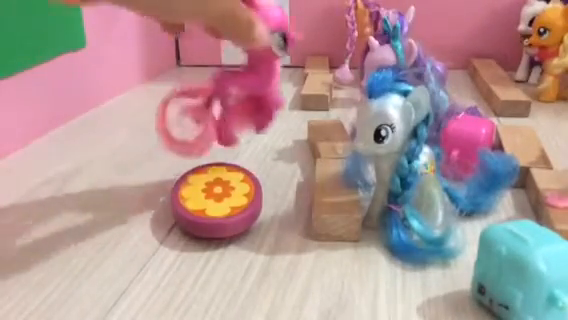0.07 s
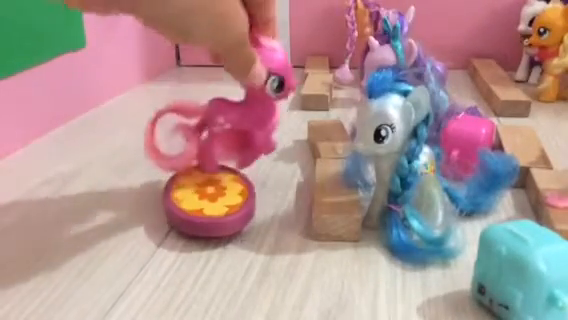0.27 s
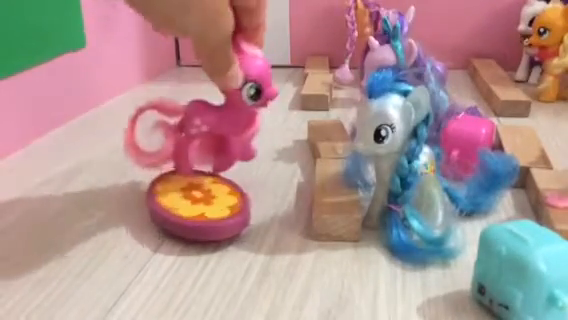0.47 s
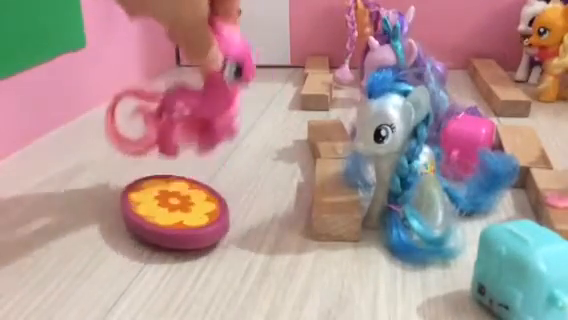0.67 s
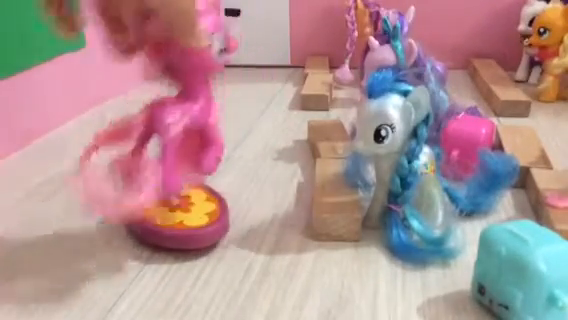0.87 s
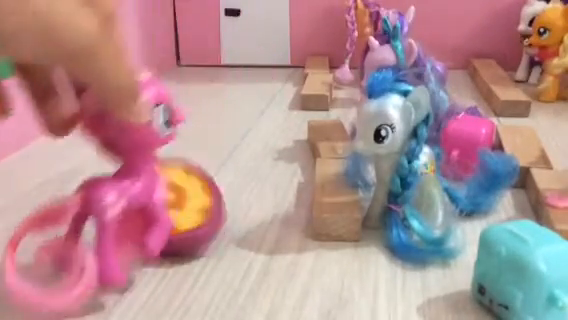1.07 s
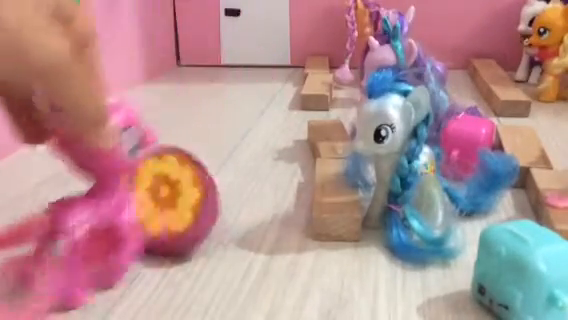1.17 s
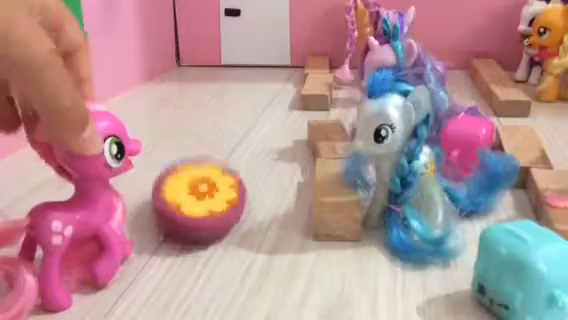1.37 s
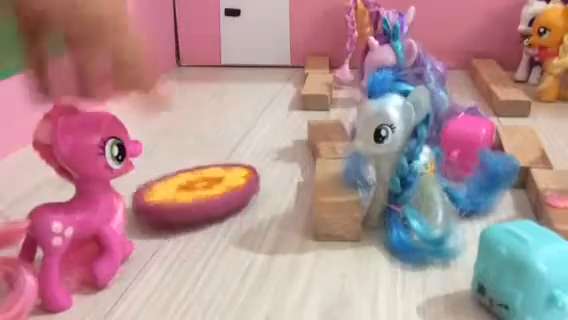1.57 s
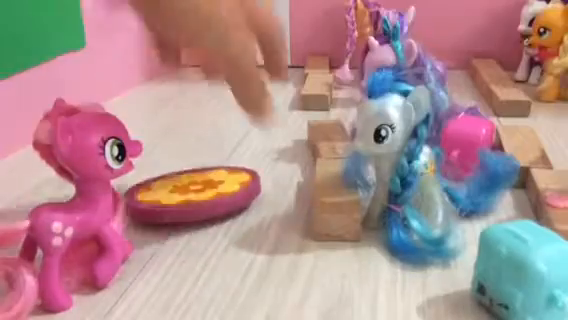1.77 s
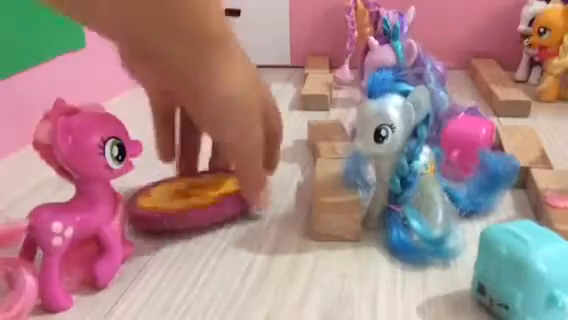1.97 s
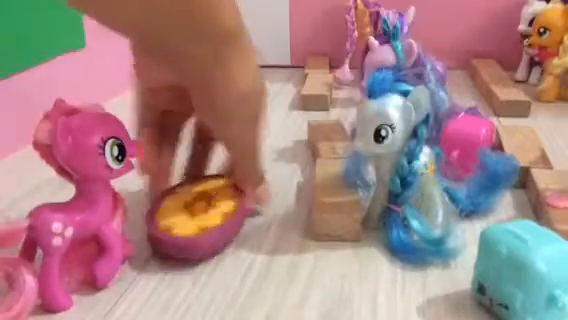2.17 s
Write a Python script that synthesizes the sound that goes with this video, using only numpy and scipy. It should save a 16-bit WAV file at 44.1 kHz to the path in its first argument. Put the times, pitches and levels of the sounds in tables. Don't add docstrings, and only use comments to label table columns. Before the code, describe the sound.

A hollow plastic disc is knocked by a toy on a laminate floor, wobbles faintly, then is pushed over, rattles on its rim, slaps down sharply and is picked up; close microphone, small quiet room.

```python
import sys
import numpy as np
from scipy import signal
from scipy.fft import rfft, irfft, next_fast_len
from scipy.io import wavfile

SR = 44100
rng = np.random.default_rng(int(sys.argv[2]) if len(sys.argv) > 2 else 0)


def natural_amplitude(level_db):
    exponent = np.asarray(level_db, float) / 20
    return 10 ** exponent


def generate_wav(signal):
    frames = np.transpose(np.atleast_2d(signal))
    scaled = np.clip(frames, -1, 1) * 32767
    pcm = np.round(scaled).astype(np.int16)
    wavfile.write(sys.argv[1], SR, pcm)


N = 98475

# pitch in Hz, level in dB per Hz.
ROOM_TONE = [(25, -12), (70, -3), (140, -4), (300, -7.5), (800, -22.5), (2000, -30.5), (6000, -31.5),
             (10000, -30)]
# pitch in Hz, width in Hz, level in dB.
HUMS = [(128, 20, -71.5), (205.7, 28, -71.5)]
# start in seconds, level in dB.
THUDS = [
    (.297, -33.5),
    (.33, -45.5),
    (.358, -47.5),
    (1.226, -41),
    (1.154, -38),
    (1.291, -35),
    (1.543, -44.5),
    (1.741, -50.5),
]
# pitch in Hz, level in dB, time to fade by 60 dB in seconds.
BOARD = [(154.6, 0.5, 0.065), (228.6, 2.5, 0.06), (313, 1.5, 0.11), (388, -1, 0.097)]
# start in seconds, peak in dB, pitch in Hz.
FINGER_TICKS = [(.398, -62, 10300), (0.507, -55.5, 8150), (.675, -62, 8300), (1.033, -62.5, 7300),
                (2.037, -55, 10000), (2.072, -54.5, 10000), (2.112, -56.5, 9300), (2.154, -52.5, 5500),
                (2.199, -48, 6800)]
# time in seconds, pitch in Hz, level in dB.
SQUEAK = [(.72, 3800, -92), (.76, 3950, -82), (.79, 3850, -80), (.82, 3450, -80), (.835, 3400, -100)]
# time in seconds, level in dB.
SWISH = [(.23, -90), (.27, -68), (.3, -75), (.33, -96)]
# start in seconds, level in dB.
SNAPS = [(0.608, -49), (.636, -58), (.646, -49), (.675, -60), (1.794, -36), (1.2254, -37.5), (1.29, -45.5),
         (1.361, -45), (1.372, -40.5), (1.544, -23), (1.618, -43.5), (1.7394, -18.5), (1.772, -26)]
# start in seconds, level in dB, pitch in Hz, length in seconds.
POCKETS = [(0.309, -33.5, 1180, .008), (.636, -39, 2250, .003), (1.157, -36, 550, .003),
           (1.29, -18.5, 603, 0.00068), (1.362, -26, 1010, 0.00087), (1.369, -39, 603, 0.0056),
           (1.7395, -23, 4470, .002), (1.7398, -23.5, 5220, 0.0022), (1.741, -25.5, 825, 0.0029),
           (1.742, -24, 2400, 0.0047), (2.044, -36, 1166, 0.0037), (2.046, -46, 833, .004),
           (2.048, -42, 660, 0.0062), (.297, -30, 584, 0.0098), (0.305, -30, 4600, .004),
           (0.611, -47, 1150, 0.0028), (0.635, -44, 780, 0.0066), (0.661, -42.5, 820, 0.0068),
           (1.155, -33, 2214, 0.0048), (1.156, -30, 3780, 0.0033), (1.227, -28, 2045, 0.0066),
           (1.446, -28, 580, 0.009), (1.443, -25.5, 1950, .008), (1.444, -31, 4150, 0.0043),
           (1.543, -20.5, 1850, 0.0071), (1.544, -36.5, 4400, 0.007), (1.616, -34, 2240, 0.0098),
           (1.617, -32, 1708, .010), (1.675, -23, 4500, 0.0055), (1.678, -28, 1753, 0.014),
           (1.671, -32, 2450, 0.013), (1.769, -29.5, 1210, 0.0083), (1.771, -34.5, 4180, 0.0054),
           (1.794, -32, 2120, 0.0043), (0.294, -38, 5300, .002), (1.157, -34, 790, 0.0021),
           (1.156, -34, 4900, 0.0022), (1.226, -35, 760, .003), (1.449, -29.5, 2140, 0.014),
           (1.541, -31, 1500, .005), (1.7396, -25, 6200, .002)]
# pitch in Hz, level in dB, time to fade by 60 dB in seconds.
SHELL = [(485, -8, 0.015), (589.5, -1, 0.032), (827, -4.5, 0.034), (1179, -1.5, 0.031), (1523, -4.5, 0.023),
         (1884, -3.5, 0.02), (2190, -3, 0.024), (2416, -4.5, 0.02), (2818, -8.5, 0.017), (3613, -6, 0.011),
         (4204, -5.5, 0.016), (4598, -7.5, 0.011), (5090, -7, 0.014), (5754, -9, 0.0085)]
# start in seconds, peak in dB, then body, rim and high modes in dB.
KNOCKS = [
    (.297, -14.5, 7, 2, 7),
    (.3075, -15, -4, 2, 6),
    (1.1555, -16, -3, -8.5, 3.5),
    (1.2255, -10, -9.5, -17, -15),
    (1.291, -15.5, 2.5, 1.5, -10),
    (1.309, -33, 15, -9, -28),
    (1.7395, -7, -7.5, 1.5, 10.5),
    (2.0465, -20, 0, 6.5, 0),
]
TAPS = [(.285, -50.5, 13, -7, 7.5), (.407, -53, 13, -3, 0), (.425, -40.5, 5, 10, -14),
        (.567, -47, 4.5, 8.5, 4), (.574, -58, -9, -4, 15), (.588, -57, 8, 4, 4),
        (.609, -42.5, 5, 18.5, 10.5), (.624, -51, 8, 1, 12), (.635, -29.5, -9.5, 4, 4),
        (.643, -42.5, 1, 4, 10), (.661, -43.5, 5, 12, 8), (.674, -54, 2, 0, 14), (.696, -49.5, 16, -1, 6)]
SKIDS = [(.313, -21.5, -2.5, 3.5, -7), (.329, -29.5, 3, -1, -8), (.345, -41, -6, -16, 1),
         (1.283, -28.5, -16, -1, -4.5), (1.3605, -15.5, -15, -4, -12.5), (1.368, -14.5, 2.5, -10, -10.5),
         (1.441, -22.5, 2.5, 0.5, 3), (1.4445, -13, -9, -1.5, -5.5), (1.453, -16.5, -6.5, -5, -5),
         (1.540, -22.5, -4, -8, 6.5), (1.543, -11.5, -3, 4.5, -1), (1.547, -16.5, -7.5, -5, 1),
         (1.556, -26, 2, 3.5, 1), (1.607, -20.5, -9.5, -1.5, -6.5), (1.615, -10.5, -13.5, 0.5, -8),
         (1.625, -8, -14, -10.5, -12.5), (1.674, -19, -6.5, -4.5, 2.5), (1.678, -9.5, -11, 1, -5.5),
         (1.770, -18.5, -9.5, 6, 7.5), (1.7735, -17, 0, -1, 9.5), (1.790, -25.5, -2, 5, 0),
         (1.795, -17, -18, -6.5, 0.5), (1.808, -35, 2, 5, -8), (1.349, -19, -5, -6, -28),
         (1.379, -23, -11, 3, -7)]
GRABS = [(2.019, -47, 8.5, 7.5, 2), (2.038, -34.5, 4.5, 4.5, -5), (2.045, -19.5, 0, -14, 2.5),
         (2.066, -53, -17, -11, -6), (2.123, -52.5, 11, 12, 0), (2.191, -57.5, -5, 15, 10),
         (2.208, -56, 14, -2, 14)]
# time in seconds, level in dB.
WOBBLE = [(.40, -61.5), (.44, -64.5), (.54, -72), (.6, -57.5), (.645, -53), (.7, -67.5), (.73, -82),
          (.8, -84), (.85, -97)]
# time in seconds, level in dB.
ROLL = [(1.2, -83), (1.236, -45), (1.328, -43.5), (1.373, -35), (1.409, -47), (1.5, -59.5), (1.53, -54.5),
        (1.599, -49.5), (1.625, -35.5), (1.66, -44.5), (1.732, -58), (1.789, -35), (1.83, -57.5),
        (1.87, -81)]
# time in seconds, level in dB.
HANDLING = [(2.0, -82.5), (2.03, -65), (2.08, -65.5), (2.14, -77.5), (2.19, -74.5), (2.23, -58)]

ROOM_TONE_DB = -64.5
ROOM_T60_S, ROOM_DB, WALL_CUT_HZ = 0.2, -25.5, 14700
MIC_LOW_HZ, TREBLE_END_HZ = 142, 16000
VALLEY_HZ, VALLEY_Q, VALLEY_SHARE = 3300, 2, 0.049
THUD_S, THUD_KICK_DB, BOARD_DB = 0.022, 19.5, -29.0
TICK_S, SWISH_HZ = 0.0077, 10000
SNAP_S, SNAP_HZ = 0.0027, 10000
POCKET_RING_S, POCKET_RING_SLOPE, POCKET_DB, POCKET_KICK_DB = 0.025, -0.38, -16.0, 13.5
POCKET_HOLD = 0.29
STRIKE_DB, MODE_SCATTER_DB, CLICK_SCATTER_DB = -13.5, 1, 3.5
CHATTER_DB, CHATTER_LOSS_DB, KNOCK_CHATTER_DB, SKID_CHATTER_DB = -6, 7, -5.5, 3.5
KNOCK_CHATTER_S, TAP_CHATTER_S, SKID_CHATTER_S = 0.003267, 0.0051, 0.01
KNOCK_AIR_DB, TAP_AIR_DB, SKID_AIR_DB = -2, -9, 1
LEAD_S, LEAD_DB = 0.0017, -16.5
LOW_HZ, RIM_HZ, MID_HZ, HIGH_HZ = 586, 1230, 1850, 4620
TILT_DETUNE, SHELL_LOW_HZ, CONTACT_HZ = 0.037, 361, 7400
CRACK_DB, CRACK_S, CRACK_HZ = -6.5, 0.0041, 2460
AIR_DB, AIR_S, AIR_HZ = -22.5, 0.002, 9200
# body, rim and high modes in dB
WOBBLE_TONE, ROLL_TONE, HANDLING_TONE = (2.9, 8.2, 0), (4.2, -0.95, -12), (0, 1.7, 4.7)
ROLL_CLICKS_PER_S, ROLL_GRAIN_DB, ROLL_DB = 2200, 3.5, -22


def rms_one(x):
    return x / np.sqrt(np.mean(x ** 2) + 1e-20)


def at_hz(points, hz):
    table_hz, value = np.array(points).T
    return np.interp(np.log(hz), np.log(table_hz), value)


def ring(clicks, hz, t60):
    r, w = natural_amplitude(-60 / (t60 * SR)), 2 * np.pi * hz / SR
    return signal.lfilter([0, np.sin(w)], [1, -2 * r * np.cos(w), r * r], clicks + 1e-18)


def band(x, low_hz, high_hz):
    return signal.sosfilt(signal.butter(2, [low_hz, high_hz], "band", fs=SR, output="sos"), x)


def place(s, size):
    out = np.zeros(N)
    where = np.clip((s * SR).astype(int), 0, N - 1)
    np.add.at(out, where.ravel(), size.ravel())
    return out


def burst(clicks, decay_s):
    r = np.exp(-1 / (decay_s * SR))
    return signal.lfilter([1], [1, -r], np.abs(clicks) + 1e-18) * rng.standard_normal(N)


def level_curve(points, before_db, after_db):
    s, db = np.transpose(points)
    return natural_amplitude(np.interp(np.arange(N) / SR, s, db, left=before_db, right=after_db))


def room_tone():
    white = rng.standard_normal((2, N + SR))
    edges = 20 * 2 ** np.arange(0, 10, .5)
    hiss = np.zeros(N)
    for k, (low, high) in enumerate(zip(edges, edges[1:])):
        hiss += natural_amplitude(at_hz(ROOM_TONE, np.sqrt(low * high))) * band(white[k % 2], low, high)[SR:]
    hums = np.zeros(N)
    for hz, wide, db in HUMS:
        hum = band(rng.standard_normal(N + SR), hz - wide / 2, hz + wide / 2)[SR:]
        hums += natural_amplitude(db) * rms_one(hum)
    return natural_amplitude(ROOM_TONE_DB) * rms_one(hiss) + hums


def room(x):
    size = next_fast_len(N + SR)
    w = 2 * np.pi * np.arange(size // 2 + 1) / size
    dull = 1 / (1 + 1j * w * SR / (2 * np.pi * WALL_CUT_HZ))
    echo = 0
    for k, lag in enumerate(rng.uniform(.008, .05, size=40) * SR):
        loop = natural_amplitude(-60 * lag / SR / ROOM_T60_S) * dull * np.exp(-1j * w * lag)
        echo = echo + (-1) ** k * loop / (1 - loop)
    return irfft(rfft(x, size) * echo, size)[:N]


def board():
    s, db = np.transpose(THUDS)
    kicks = place(s, natural_amplitude(db))
    out = np.zeros(N)
    for hz, mode_db, t60 in BOARD:
        push = natural_amplitude(THUD_KICK_DB) * kicks + burst(kicks, THUD_S)
        out += natural_amplitude(mode_db + BOARD_DB) * ring(push, hz, t60)
    return out


def fingers():
    ticks = np.zeros(N)
    for start, peak_db, tick_hz in FINGER_TICKS:
        puff = burst(place(np.array(start), natural_amplitude(peak_db)), TICK_S)
        ticks += band(puff, .85 * tick_hz, 1.2 * tick_hz)
    s, hz, db = np.transpose(SQUEAK)
    pitch = np.interp(np.arange(N) / SR, s, hz)
    waver = 1 + .3 * rms_one(band(rng.standard_normal(N), 10, 60))
    loudness = level_curve(np.transpose([s, db]), -140, -140)
    squeak = loudness * waver * np.sin(2 * np.pi * np.cumsum(pitch) / SR)
    hair = rms_one(band(rng.standard_normal(N), 0.86 * SWISH_HZ, 1.1 * SWISH_HZ))
    return ticks + squeak + level_curve(SWISH, -140, -140) * hair


def snaps():
    s, db = np.transpose(SNAPS)
    return band(burst(place(s, natural_amplitude(db)), SNAP_S), 0.51 * SNAP_HZ, 1.0 * SNAP_HZ)


def pockets():
    out = np.zeros(N)
    for s, db, hz, length in POCKETS:
        kick = place(np.array(s), natural_amplitude(db + POCKET_DB))
        blow = natural_amplitude(POCKET_KICK_DB) * kick + burst(kick, length)
        t60 = POCKET_RING_S * (hz / 1000) ** POCKET_RING_SLOPE * (200 * length) ** POCKET_HOLD
        out += ring(blow, hz, t60)
    return out


def rolling_grains():
    t = np.arange(N) / SR
    rolling = sum(level_curve(c, -120, c[-1][1]) for c in (WOBBLE, ROLL, HANDLING))
    stage = np.searchsorted([ROLL[0][0], HANDLING[0][0]], t)
    tone = np.array([WOBBLE_TONE, ROLL_TONE, HANDLING_TONE])[stage].T
    born = rng.random(N) < ROLL_CLICKS_PER_S / SR
    bumps = natural_amplitude(ROLL_GRAIN_DB * np.minimum(rng.exponential(1, N), 4))
    return rms_one(born * bumps) * rolling * natural_amplitude(ROLL_DB), tone


def strikes(count=7):
    kinds = [(KNOCKS, KNOCK_CHATTER_S, KNOCK_AIR_DB), (TAPS + GRABS, TAP_CHATTER_S, TAP_AIR_DB),
             (SKIDS, SKID_CHATTER_S, SKID_AIR_DB)]
    rows = [(*row, chatter_s, air_db) for table, chatter_s, air_db in kinds for row in table]
    s, db, low_db, rim_db, high_db, chatter, air_db = np.transpose(rows)[:, :, None]
    knock = chatter == KNOCK_CHATTER_S
    k = np.arange(count) - 1
    after = (k + rng.random((len(s), count)) * (k > 0)) / (count - 1)
    times = s + np.where(k < 0, -LEAD_S, chatter * after)
    chatter_db = CHATTER_DB + KNOCK_CHATTER_DB * knock + SKID_CHATTER_DB * (chatter == SKID_CHATTER_S)
    chatter_db = (chatter_db - CHATTER_LOSS_DB * after) * (k > 0)
    size_db = db + STRIKE_DB + np.where(k < 0, LEAD_DB, chatter_db)
    return times, size_db, (low_db, rim_db, high_db), air_db, knock


def disc():
    times, size_db, (low_db, rim_db, high_db), air_db, knock = strikes()
    grains, tone = rolling_grains()
    out = np.zeros(N)
    for hz, mode_db, t60 in SHELL:
        low, rim, _, high = [at_hz(list(zip((LOW_HZ, RIM_HZ, MID_HZ, HIGH_HZ), row)), hz) for row in np.eye(4)]
        chance_db = MODE_SCATTER_DB * rng.standard_normal(knock.shape)
        chance_db = chance_db + CLICK_SCATTER_DB * rng.standard_normal(times.shape)
        gain = natural_amplitude(size_db + low * low_db + rim * rim_db + high * high_db + chance_db)
        hits = gain * rng.choice([-1, 1], times.shape)
        rub = grains * rng.choice([-1, 1], N) * natural_amplitude(low * tone[0] + rim * tone[1] + high * tone[2])
        side = np.where(knock, 1, rng.integers(0, 3, knock.shape))
        grain_side = rng.integers(0, 3, N)
        for lean in range(3):
            clicks = place(times, hits * (side == lean)) + rub * (grain_side == lean)
            out += natural_amplitude(mode_db) * ring(clicks, hz * (1 + TILT_DETUNE * (lean - 1)), t60)
    bright = grains * natural_amplitude(tone[2])
    crack = burst(place(times, natural_amplitude(size_db + high_db)) + bright, CRACK_S)
    crack = natural_amplitude(CRACK_DB) * band(crack, 1.08 * CRACK_HZ, 2.084 * CRACK_HZ)
    air = burst(place(times, natural_amplitude(size_db + 0.95 * high_db + air_db)) + bright, AIR_S)
    air = natural_amplitude(AIR_DB) * band(air, 0.71 * AIR_HZ, 1.55 * AIR_HZ)
    return band(out + crack + pockets(), SHELL_LOW_HZ, CONTACT_HZ) + air


def scene():
    shell = disc()
    valley = signal.lfilter(*signal.iirpeak(VALLEY_HZ, VALLEY_Q, fs=SR), shell)
    near = shell - VALLEY_SHARE * valley + snaps() + board() + fingers()
    near = signal.sosfilt(signal.butter(2, MIC_LOW_HZ, "high", fs=SR, output="sos"), near)
    return (near + natural_amplitude(ROOM_DB) * room(near) + room_tone())[None]


def top_cut(x):
    return signal.sosfilt(signal.butter(12, 15670, fs=SR, output="sos"), x)


def record(dry):
    cut = signal.cheby2(12, 60, TREBLE_END_HZ, fs=SR, output="sos")
    mix = signal.sosfilt(cut, dry)
    return top_cut(mix)


dry = scene()
out = record(dry)
generate_wav(out)
```